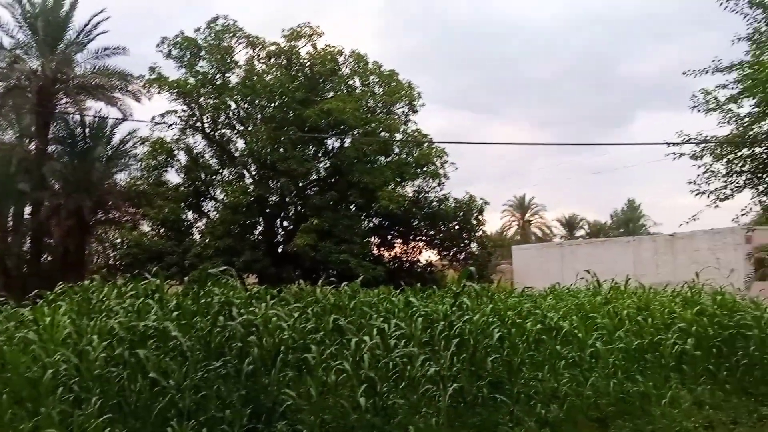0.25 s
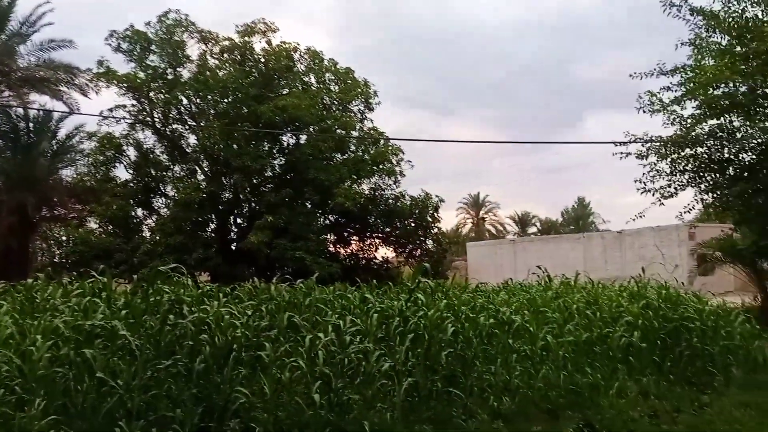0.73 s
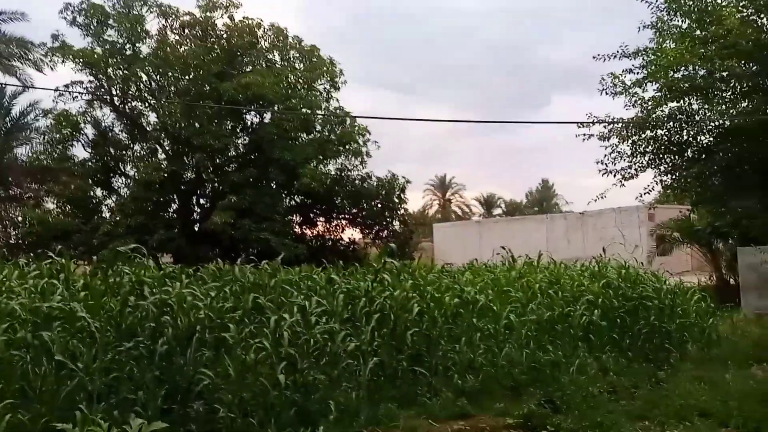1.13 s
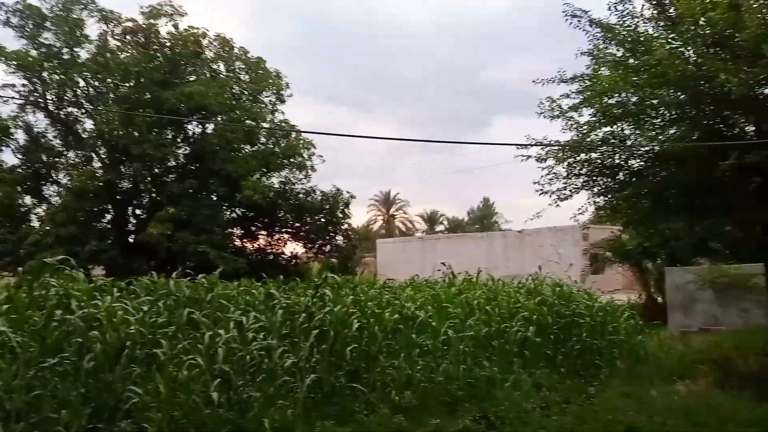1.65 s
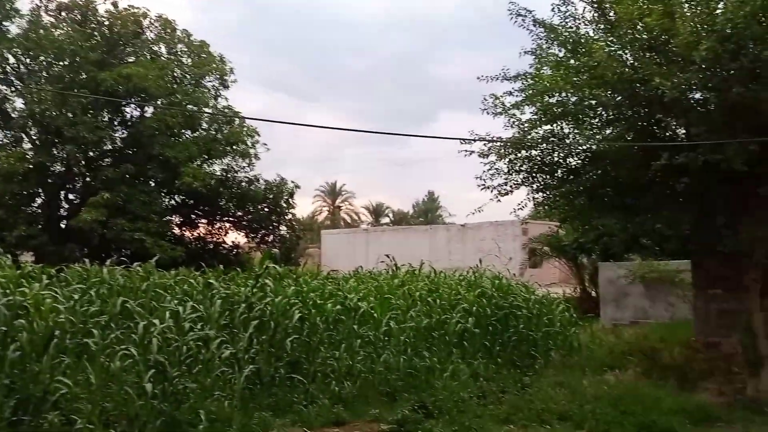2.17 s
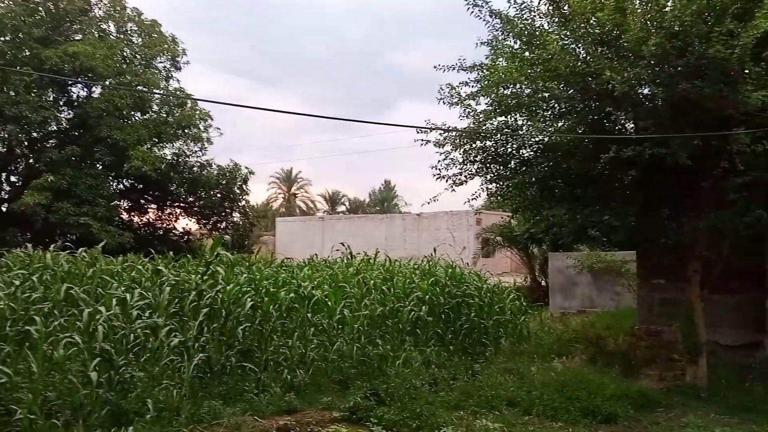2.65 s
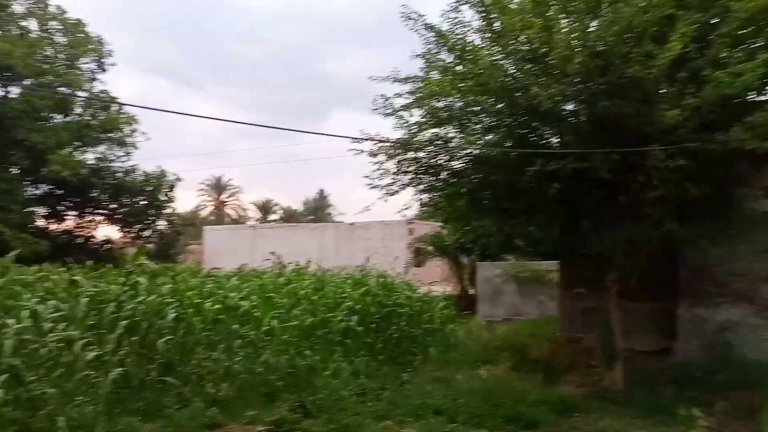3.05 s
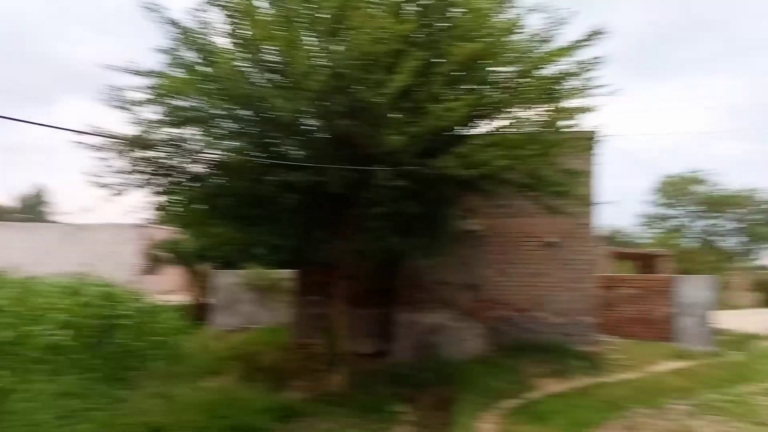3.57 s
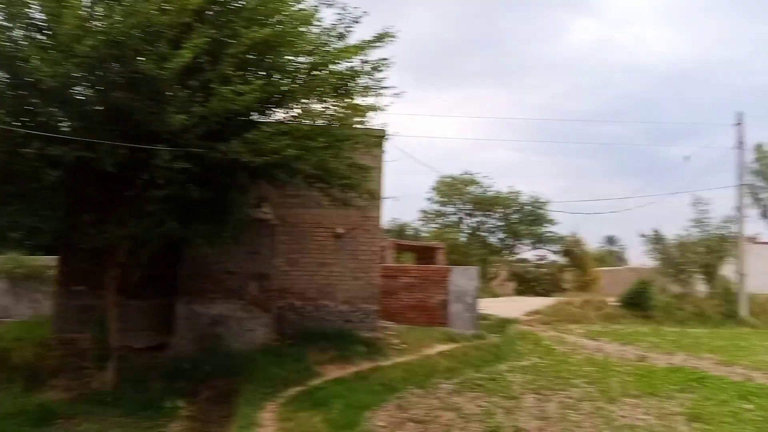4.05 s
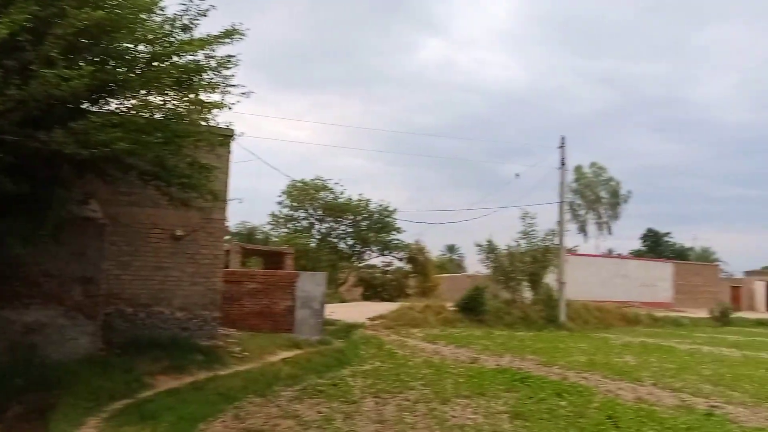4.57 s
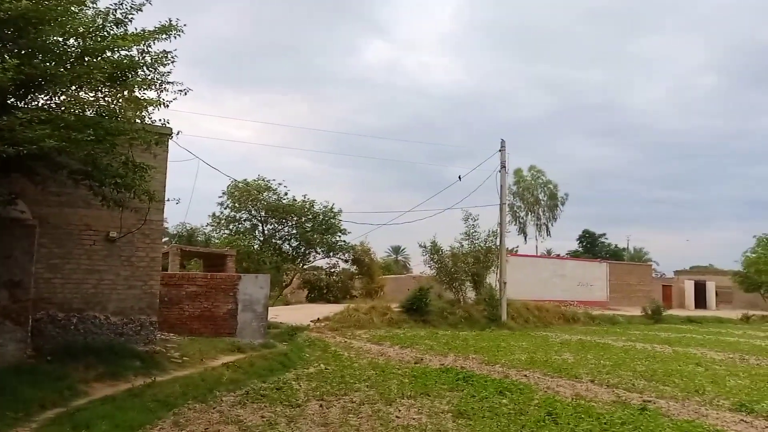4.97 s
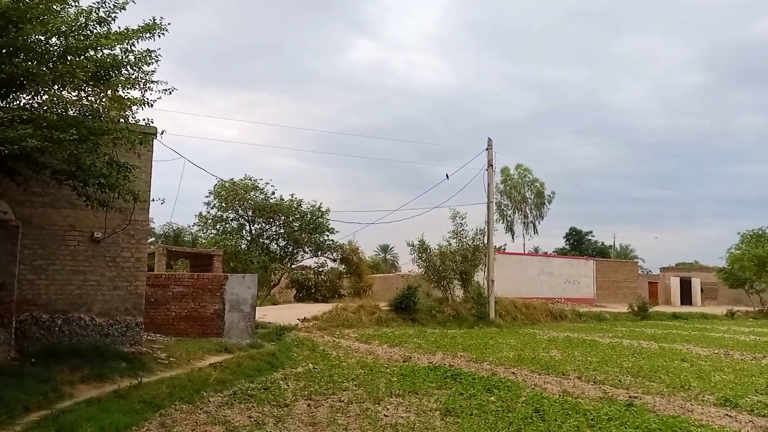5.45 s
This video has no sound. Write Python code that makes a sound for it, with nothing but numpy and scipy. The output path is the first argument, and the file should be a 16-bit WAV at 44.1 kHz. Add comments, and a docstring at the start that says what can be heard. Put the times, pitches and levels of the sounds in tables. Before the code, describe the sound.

At the edge of a village field, many small birds twitter thinly over a faint rumble and hiss. A warbler gives sharp ticks, singly and in pairs, throughout. Far doves are barely heard, then nearer coos come. After a few harsh churrs, babblers start rasping about four times a second, swelling and joined by loud falling whistles. A small single-channel microphone captures it with slightly dull treble.

```python
"""Thin twitter and a far chorus of birds at the edge of a village field, under the sharp ticks of a warbler,
alone and in pairs. Faint doves sound first, nearer ones coo later; a few harsh churrs come before a flock of
babblers breaks into swelling rasps and slurred whistles. Each bird voice is a sum of partials on a moving
pitch, roughened by random shaking; trees and brick walls scatter every call into decaying noise.
A low rumble and a thin hiss of shaped noise lie underneath."""
import sys
import numpy as np
from scipy import signal
from scipy.fft import rfft, irfft, next_fast_len
from scipy.io import wavfile
from scipy.ndimage import uniform_filter1d, map_coordinates

SR = 44100
rng = np.random.default_rng(int(sys.argv[2]) if len(sys.argv) > 2 else 0)


def store_pcm(level_fs):
    """Save levels as 16-bit WAV."""
    pcm = np.round(np.clip(level_fs, -1, 1) * 32767).astype(np.int16)
    wavfile.write(sys.argv[1], SR, np.atleast_2d(pcm).T)


N = 251811


def amp(db):
    """Decibels to gain."""
    return 10 ** (np.asarray(db) / 20)


def unit(x):
    """Scale to rms 1."""
    return x / np.sqrt(np.mean(x ** 2) + 1e-20)


def along(points, hz):
    """Read (Hz, value) points on a log frequency axis."""
    f, v = np.transpose(points)
    return np.interp(np.log(hz + 1), np.log(f + 1), v)


def curves(rows, t):
    """Read each column after the time at the times t."""
    s, *cols = np.transpose(rows)
    return [np.interp(t, s, c) for c in cols]


def clock(length):
    """Sample times of a note in seconds."""
    return np.arange(max(int(length * SR), 8)) / SR


def wobble(t, rate):
    """A smooth random curve with rate knots a second."""
    own = np.random.default_rng(rng.integers(2 ** 31))
    knots = own.standard_normal(int(t[-1] * rate) + 4)
    return map_coordinates(knots, [t * rate + 1])


def filtered(x, gain):
    """Multiply the spectrum of x by a gain that depends on frequency."""
    m = next_fast_len(N + SR // 2)
    return irfft(rfft(x, m) * gain(np.fft.rfftfreq(m, 1 / SR)), m)[:N]


def add(track, s, note):
    """Mix a note into the track at s seconds."""
    i = int(np.clip(round(s * SR), 0, N))
    track[i:i + len(note)] += note[:N - i]


def fade(t, edge):
    """Soft start and end, edge seconds each."""
    return np.sin(np.pi / 2 * np.clip(np.minimum(t, t[-1] - t) / edge, 0, 1)) ** 2


def syrinx(t, hz, partials_db, rough, jitter=0.049, jitter_rate=650, shimmer_db=4):
    """A bird's voice: partials on a pitch path, with roughness shaking pitch and strength."""
    hz = hz * (1 + rough * jitter * wobble(t, jitter_rate))
    phase = 2 * np.pi * np.cumsum(hz) / SR
    tone = 0
    for k, db in enumerate(partials_db, 1):
        below_nyquist = k * hz < SR / 2
        tone = tone + amp(db) * np.sin(k * phase) * below_nyquist
    return tone * amp(rough * shimmer_db * wobble(t, 330))


def outdoors(x, wet_db):
    """Direct sound plus the diffuse answer of trees and walls: noise that decays at each pitch's own rate."""
    # How long the trees ring. Each row: frequency in Hz, time to decay by 60 dB in seconds.
    decay_time = [(500, 0.37), (2500, 0.42), (6000, 0.25), (10000, 0.31), (16000, 0.091)]
    out, t = x.copy(), np.arange(N) / SR
    # a fresh scatter pattern every second, crossfaded into the next
    for second in range(7):
        hz, age, grains = signal.stft(rng.standard_normal(SR // 2), SR, nperseg=256)
        decay_db = -60 * age / along(decay_time, hz)[:, None]
        tail = signal.istft(grains * amp(decay_db), SR, nperseg=256)[1]
        tail = np.pad(tail, (SR // 300, 0)) / np.linalg.norm(tail)  # the answer waits about 3 ms
        share = np.clip(1 - abs(t - second), 0, 1)
        out += amp(wet_db) * signal.fftconvolve(x * share, tail)[:N]
    return out


def trill(length):
    """A thin, high note whose pitch and strength shake about sixty times a second."""
    t = clock(length)
    shake = np.sin(2 * np.pi * 58 * t + 1.35 * wobble(t, 35.9))
    hz = 6740 + 200 * shake + 80 * wobble(t, 10.72)
    return amp(0.5 * shake) * syrinx(t, hz, [0, -32], rough=0.262) * fade(t, 0.013)


def chirp(length, from_hz, to_hz, rough):
    """One short note gliding evenly in musical pitch."""
    t = clock(length)
    return syrinx(t, np.geomspace(from_hz, to_hz, len(t)), [-1, -28], rough) * fade(t, 0.008)


def rasp(length, pitch_hz, rough, rate=31, swing=0.121, pulse_db=2, stagger=2, drift=0.0538):
    """Pitch flicks up and sags about thirty times a second; a harsh call staggers in rhythm and pitch."""
    t = clock(length)
    cycle = 2 * np.pi * rate * t + rough * stagger * wobble(t, 45)
    flick = swing * signal.sawtooth(cycle, .12)
    hz = pitch_hz * (1 + flick + rough * drift * wobble(t, 130.55))
    voice = syrinx(t, hz, [-11.5, -1.5, -15.5, -30.0, -30.0, -41, -39], rough, jitter=0.0551)
    return voice * amp(-pulse_db * np.cos(cycle)) * fade(t, 0.015)


def squawk(length, from_hz, to_hz):
    """A harsh slide down; the voice doubles its period, which adds partials halfway between the others."""
    t = clock(length)
    hz = to_hz + (from_hz - to_hz) * (1 - t / t[-1]) ** 2
    return syrinx(t, hz / 2, [-17, 2.5, -1, -26, -27, -19], rough=1.0) * fade(t, 0.021)


def air():
    """A faint, uneven rumble of the village and a thin hiss, both shaped noise."""
    # How the rumble sinks. Each row: time in seconds, level in dB.
    rumble = [(0, -64), (1.3, -68), (1.9, -65), (3, -66.5), (4, -70), (5.71, -73)]
    # Tone of the rumble. Each row: frequency in Hz, relative spectrum level in dB.
    low_band = [(20, -32), (50, -10.5), (88, 3), (130, -5.5), (220, -22), (600, -42), (2000, -86)]
    # Tone of the hiss. Each row: frequency in Hz, relative spectrum level in dB.
    hiss_band = [(20, -20), (200, -9.5), (500, -12), (1200, -17.5), (3000, -6), (7500, -3), (8800, -28.5),
                 (13500, -21.5), (15200, -29), (16000, -40)]
    t = np.arange(N) / SR
    low = unit(filtered(rng.standard_normal(N), lambda hz: amp(along(low_band, hz))))
    hiss = unit(filtered(rng.standard_normal(N), lambda hz: amp(along(hiss_band, hz))))
    low_db = curves(rumble, t)[0] + 0.4 * wobble(t, 23)
    hiss_db = -53.5 + 2.2 * wobble(t, 8.2)
    return low * amp(low_db) + hiss * amp(hiss_db)


def flock_bed(flock, band, db):
    """Colour a flock's calls, even out their swells and lay a level curve over them."""
    far = unit(filtered(flock, lambda hz: amp(along(band, hz))))
    swell = np.sqrt(abs(uniform_filter1d(far ** 2, SR // 6)) + 0.023)
    return amp(db) * far / swell


def chorus(sparrow_count=900, babbler_count=80, piper_count=170):
    """Many far birds, scattered at random in time and pitch, whose calls melt together among the trees."""
    # How the far sparrows come and go. Each row: time in seconds, level in dB before a common trim.
    sparrow_level = [(0.0, -44), (0.33, -43.5), (1.26, -50), (1.4, -52.5), (2.16, -52.5), (2.69, -37.5),
                     (3.99, -48), (4.47, -43.5), (4.56, -47), (5.02, -35), (5.44, -42), (5.71, -41.5)]
    # How the far babblers come and go. Each row: time in seconds, level in dB.
    babbler_level = [(0, -81), (.7, -58), (1.3, -85), (2.1, -53), (2.6, -62), (2.8, -46), (3.7, -43),
                     (4.02, -43.5), (4.6, -38), (5.3, -47.5), (5.71, -36)]
    # Colour of the sparrows. Each row: frequency in Hz, gain in dB.
    sparrow_band = [(2000, -37), (2800, 1), (3500, 3.5), (5000, 5), (6200, 4.5), (7200, -24), (8000, -7),
                    (9000, -30), (16000, -51.5)]
    # Colour of the babblers. Each row: frequency in Hz, gain in dB.
    babbler_band = [(1000, -39), (1400, -6.5), (1750, -8), (2300, 10), (3500, 2), (5000, -31), (7000, 8),
                    (8500, 8.5), (14000, -15)]
    sparrow_trim_db, sparrow_spread_db = -1, 10  # spread: loudest over softest of the flock
    sparrows, babblers, pipers = np.zeros((3, N))
    for when, pitch, length, size, glide in rng.random((sparrow_count, 5)):
        t = clock(0.0096 + 0.064 * length)
        hz = (3100 + 4150 * pitch) * np.exp(0.0301 * wobble(t, 91.7) + 7 * (glide - .6) * t)
        note = syrinx(t, hz, [0], rough=0.37) * fade(t, 0.0067)
        add(sparrows, when * N / SR, amp(sparrow_spread_db * size) * note)
    for when, pitch, size in rng.random((babbler_count, 3)):
        add(babblers, when * N / SR, amp(2.7 * size) * rasp(0.11, 1400 + 1100 * pitch, rough=0.67))
    # the most distant calls keep only their low notes
    for when, pitch, length, size in rng.random((piper_count, 4)):
        t = clock(0.029 + 0.09 * length)
        hz = (650 + 1800 * pitch) * np.exp(0.0449 * wobble(t, 14.3))
        note = syrinx(t, hz, [0], rough=0.84) * fade(t, 0.051)
        add(pipers, when * N / SR, amp(4.6 * size) * note)
    t = np.arange(N) / SR
    out = amp(-68) * unit(outdoors(pipers, wet_db=-9.0))
    sparrow_db = curves(sparrow_level, t)[0] + sparrow_trim_db
    out += flock_bed(outdoors(sparrows, wet_db=-2), sparrow_band, sparrow_db)
    out += flock_bed(outdoors(babblers, wet_db=-2), babbler_band, curves(babbler_level, t)[0])
    return out


def small_birds():
    """Evenly repeated twitter, low piping, slurs, chirps and bright glints: short tones with much scatter."""
    # Bouts of thin twitter. Each row: start in seconds, end in seconds, level in dB.
    twitter = [(0, .9, -51), (1.418, 2.75, -48), (3.074, 3.95, -43.5), (4.488, 5.7, -43)]
    # Low notes piped by a far bird. Each row: start in seconds, pitch in Hz, level in dB.
    pipes = [(0, 1332, -58.5), (0.447, 1262, -54.5), (1.044, 1267, -64.5), (1.331, 830, -67)]
    # A rising slur that one bird repeats. Each row: start in seconds, level in dB.
    slurs = [(.21, -50), (.55, -47.5), (.93, -55), (1.26, -46), (1.69, -44), (2.07, -43), (2.46, -44)]
    # Short high chirps of small birds, and bright high glints on the starts of some babbler whistles.
    # Each row: start in seconds, length in seconds, first pitch in Hz, last pitch in Hz, level in dB.
    chirps_and_glints = [(.235, 0.087, 6420, 5850, -46.5), (.36, 0.19, 6040, 6030, -45),
                         (.851, 0.048, 6720, 4160, -39), (.922, .045, 4200, 3080, -44.5),
                         (1.191, 0.053, 3500, 2790, -51.5), (1.9, 0.021, 6070, 5990, -38),
                         (1.962, 0.021, 2264, 2560, -46), (2.279, 0.04, 6410, 4860, -38),
                         (2.316, 0.046, 6150, 6440, -38.5), (2.335, 0.061, 2770, 2657, -45),
                         (2.406, 0.05, 5600, 3490, -39.5), (2.418, 0.047, 6650, 5980, -36.5),
                         (2.599, 0.035, 4540, 4520, -37), (2.807, 0.099, 5230, 5240, -43),
                         (3.482, 0.054, 3750, 3740, -44), (4.38, .04, 6600, 6720, -30),
                         (4.837, 0.018, 6400, 6100, -34), (5.084, 0.04, 6060, 5900, -41),
                         (5.535, 0.017, 6460, 6290, -26.5), (5.6, 0.17, 3100, 3120, -41.5)]
    twitter_every_s, twitter_s = .1415, 0.085
    out = np.zeros(N)
    for start, end, db in twitter:
        for s in np.arange(start, end, twitter_every_s):
            add(out, s, amp(db) * trill(twitter_s))
    for s, hz, db in pipes:
        add(out, s, amp(db) * chirp(0.111, hz, hz, rough=.3))
    for s, db in slurs:
        add(out, s, amp(db) * chirp(0.075, from_hz=3480, to_hz=3704, rough=0.75))
    for s, length, from_hz, to_hz, db in chirps_and_glints:
        add(out, s, amp(db) * chirp(length, from_hz, to_hz, rough=0.29))
    return outdoors(out, wet_db=3.0)


def doves():
    """Almost pure, arched coos, most breaking into an upper register and back; far doves hold level notes."""
    # Far doves on level notes. Each row: start in seconds, length in seconds, pitch in Hz,
    # level in dB before a common trim.
    far_coos = [(0, 0.055, 322, -56), (0.31, 0.054, 329, -55.5), (0.613, 0.082, 321, -60),
                (0.957, 0.047, 316, -59.5), (2.677, 0.165, 611.4, -56.5), (3.932, 0.1, 675, -54)]
    # Nearer coos. Each row: start in seconds, length in seconds, upper register from and until in seconds
    # after the start, pitch aimed at in Hz, last pitch in Hz, level in dB at the throat's resonance.
    coos = [(2.377, 0.18, 0.15, 0.15, 623.5, 594, -47.5), (2.613, .44, .09, .28, 653, 491, -42),
            (3.337, 0.19, 0.028, 0.13, 690, 485, -42), (3.976, 0.2, 0.061, .18, 677, 550, -45),
            (4.254, .43, .05, .255, 631.3, 476.5, -41), (4.982, .215, 0.022, 0.13, 689, 469, -42.5)]
    start_hz, rise_s = 503.7, 0.02956  # a coo rises fast, then sags
    break_ratio, break_s = 1.165, 0.013  # the pitch jump between the registers
    throat_hz, throat_width_hz, throat_db = 605, 92, 12  # loudest as the pitch passes this resonance
    release_share, release_db = 0.23, 8  # the last part of a coo dies away
    out = np.zeros(N)
    for s, length, hz, db in far_coos:
        t = clock(length)
        add(out, s, amp(db + 0.5) * syrinx(t, hz, [0, -18], rough=0.37) * fade(t, 0.011))
    for s, length, up, down, aim_hz, last_hz, db in coos:
        t = clock(length)
        jump_up = np.clip((t - up) / break_s + .5, 0, 1)
        jump_down = np.clip((t - down) / break_s + .5, 0, 1)
        rise = (aim_hz - start_hz) * np.exp(-t / rise_s)
        sag = (aim_hz - last_hz) * t / length
        hz = (aim_hz - rise - sag) * break_ratio ** (jump_up - jump_down)
        resonance_db = throat_db * (np.exp(-((hz - throat_hz) / throat_width_hz) ** 2) - 1)
        dying_db = release_db * np.clip(1 - (1 - t / length) / release_share, 0, 1)
        voice = syrinx(t, hz, [1, -29], rough=.08) * fade(t, 0.012)
        add(out, s, amp(db + resonance_db - dying_db) * voice)
    return outdoors(out, wet_db=-6)


def warbler():
    """Each tick whips up to the top of its range and back; the second of a pair is often strong throughout."""
    # The ticks. Each row: time of the loudest point in seconds, level in dB before a common trim,
    # lift of the far ends of the sweep in dB before a common trim.
    ticks = [(0.032, -25.5, 8), (0.7496, -28, 3.5), (1.1613, -25, 0.5), (1.6517, -22.5, 3),
             (2.065, -26, 6.5), (2.1382, -27, 19), (2.5684, -21.5, 5.5), (2.66, -28, 18.5),
             (3.1209, -25, 10.5), (3.1948, -25.5, 17.5), (3.6954, -27, 8.5), (4.0945, -29, 14),
             (4.1777, -25.5, 14), (4.6691, -25, 5.5), (5.051, -24.5, 4), (5.1364, -26, 11),
             (5.5739, -22, 2), (5.6533, -24, 9.5)]
    # The very fast pitch arch of one tick. Each row: time from its start in seconds, nominal pitch in Hz,
    # relative level in dB.
    arch = [(0, 3450, -13), (.0035, 4760, -20), (.006, 4810, 9.5), (.008, 6450, -5.5), (.0105, 8330, -24.5),
            (.013, 10000, -7.5), (.022, 9600, -12.5), (.025, 7920, -45), (.0265, 6270, -12),
            (.029, 4850, -7), (.038, 4340, -27)]
    # Echoes off the ground, a trunk and a wall. Each row: delay in seconds, level in dB under the tick.
    echoes = [(.0023, -9), (.0052, -13), (.021, -12)]
    out, t = np.zeros(N), clock(arch[-1][0])
    hz, shape_db = curves(arch, t)
    off_centre = np.clip(abs(hz - 5200) / 1700, 0, 1)
    for s, db, ends_db in ticks:
        start = s - arch[2][0]
        detune = 1 + 0.0108 * rng.normal()
        tick = syrinx(t, hz * detune, [0, -25 + ends_db, -28], rough=0.54)
        tick *= amp(db - 3.5 + shape_db + (ends_db - 1.0) * off_centre) * fade(t, 0.00043)
        add(out, start, tick)
        for delay, echo_db in echoes:
            add(out, start + delay, amp(echo_db) * tick)
    return outdoors(out, wet_db=-4.5)


def churrs():
    """A few short, slightly rising notes from close by, made harsh by strong shaking of the voice."""
    # Churrs before the chatter. Each row: start in seconds, last pitch in Hz, level in dB.
    churr_notes = [(1.633, 2615, -45), (1.812, 2190, -43), (2.034, 2160, -46)]
    rise_ratio = 1.08  # last pitch over first
    out = np.zeros(N)
    for s, hz, db in churr_notes:
        add(out, s, amp(db) * chirp(0.0827, hz / rise_ratio, hz, rough=0.95))
    return outdoors(out, wet_db=-9)


def chatter():
    """One babbler rasps about four times a second, swelling; each rasp ends in a falling flick."""
    # The rasps. Each row: start in seconds, level in dB.
    rasps = [(2.671, -39), (2.906, -38.5), (3.128, -38), (3.357, -34.5), (3.598, -36.5), (3.811, -34.5),
             (4.05, -35), (4.28, -32.5), (4.525, -33.5), (4.756, -34.5), (5.004, -34), (5.241, -31.5)]
    rasp_s, rasp_hz = 0.13, 1907
    soft_rough, soft_db, clears_per_db = .9, -38, .06  # roughness at the soft level; louder rasps are clearer
    out = np.zeros(N)
    for s, db in rasps:
        rough = np.clip(soft_rough - clears_per_db * (db - soft_db), 0, 1)
        add(out, s, amp(db) * rasp(rasp_s, rasp_hz, rough))
        add(out, s + 0.098, amp(db - 6.5) * squawk(.028, from_hz=3600, to_hz=2148))
        add(out, s + 0.022, amp(-44) * trill(rasp_s))  # a thin high trill sounds with each rasp
    return outdoors(out, wet_db=-1.5)


def whistles():
    """A babbler squawks, then a rising lead-in drops fast onto a held note that sags and flutters a little."""
    # The whistles. Each row: time of the drop in seconds, pitch at the middle of the held note in Hz,
    # level of the held note in dB, lift of the lead-in in dB.
    whistle_notes = [(3.824, 2270, -29.5, -17), (4.111, 2368, -24, -8.5), (4.392, 2374, -22.5, -1),
                     (4.683, 2346, -25, -0.5), (4.968, 2260, -24.5, -7), (5.263, 2297, -24, -2),
                     (5.542, 2300, -24, -12)]
    lead_s, hold_s, lead_ratio = .026, 0.0853, 1.37  # ratio: how far the drop falls
    drop_s, drop_db = 0.012, -2
    lead_rise, hold_sag = 7000, 700  # Hz per second
    tones, squawks, t = np.zeros(N), np.zeros(N), clock(lead_s + hold_s)
    high = np.exp(-(np.maximum(t - lead_s, 0) / drop_s) ** 1.44)  # 1 before the drop, then falling to 0
    leading = np.clip((lead_s - t) / 0.0035, 0, 1)
    slope_hz = -lead_rise * np.maximum(lead_s - t, 0) - hold_sag * (t - lead_s - hold_s / 2)
    for s, held_hz, db, lead_db in whistle_notes:
        hz = held_hz * (1 + (lead_ratio - 1) * high) + slope_hz
        hz = hz * (1 + 0.011 * wobble(t, 85.0))
        # the second partial brightens the lead-in
        note = syrinx(t, hz, [-4, -19 + 13 * leading, -24, -35, -32, -41], rough=0.26)
        level_db = db + drop_db * high + lead_db * leading + 3.0 * wobble(t, 49.0)
        add(tones, s - lead_s, note * amp(level_db) * fade(t, 0.0061))
        add(squawks, s - .076, amp(db - 14.5) * squawk(.055, from_hz=3100, to_hz=1866))
    return outdoors(tones, wet_db=-11) + outdoors(squawks, wet_db=-4)


def scene():
    """All the birds over the still air, summed to one channel."""
    birds = chorus() + small_birds() + doves() + warbler() + churrs() + chatter() + whistles()
    return (air() + birds)[None]


def record(dry):
    """The small microphone has an uneven treble and keeps nothing above its band limit."""
    # Treble response of the microphone. Each row: frequency in Hz, gain in dB.
    response = [(7600, 1), (8700, -2.5), (9900, -8.5), (11500, -10.5), (13800, -13.5), (14900, 13)]
    top_hz = 15850
    return np.array([filtered(x, lambda hz: amp(along(response, hz)) * (hz < top_hz)) for x in dry])


dry = scene()
out = record(dry)
store_pcm(out)
```